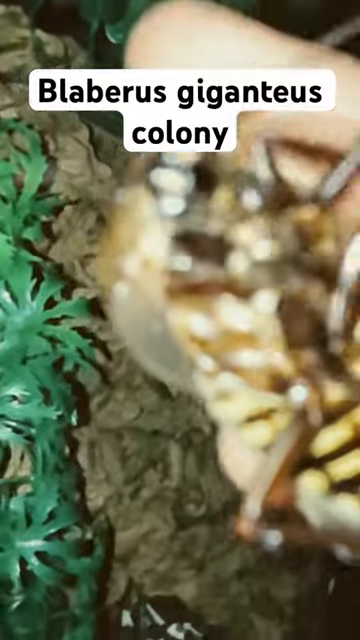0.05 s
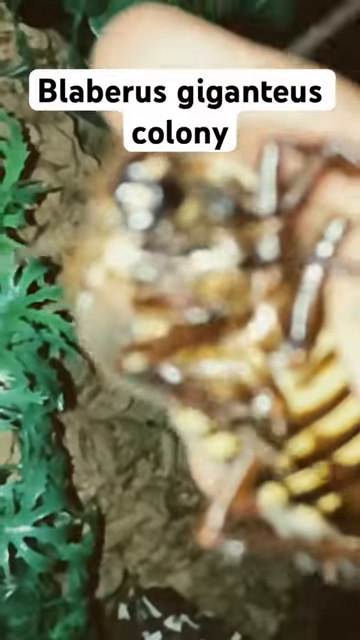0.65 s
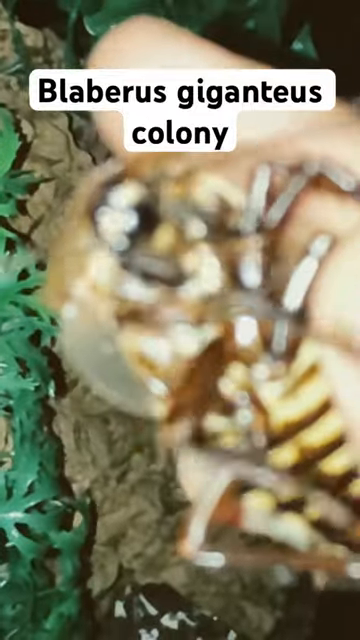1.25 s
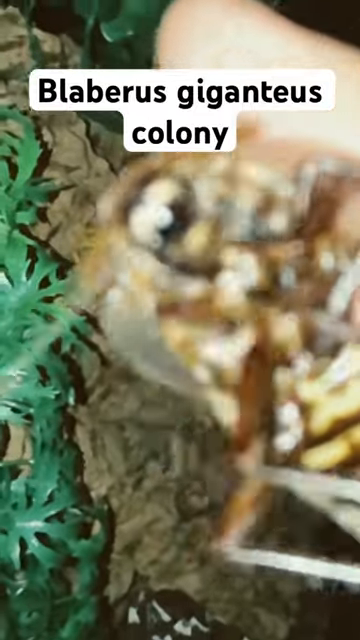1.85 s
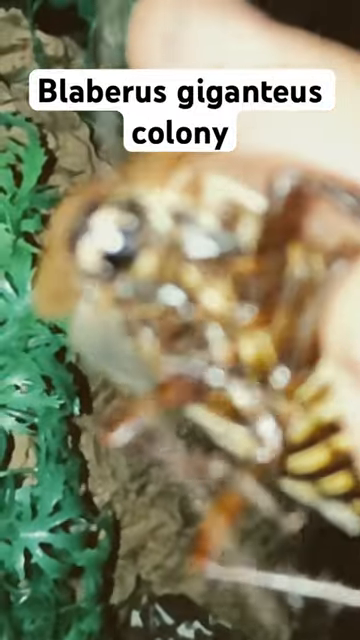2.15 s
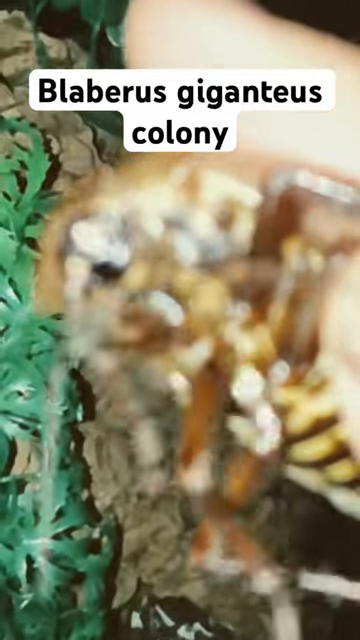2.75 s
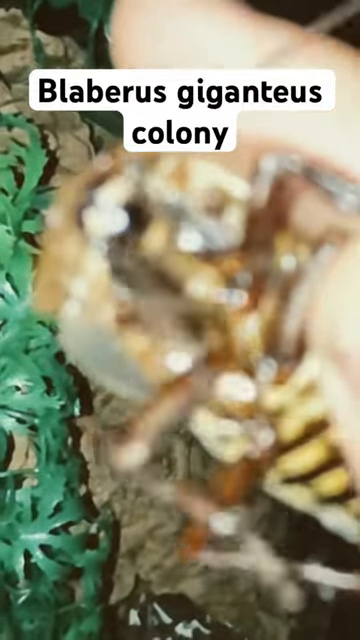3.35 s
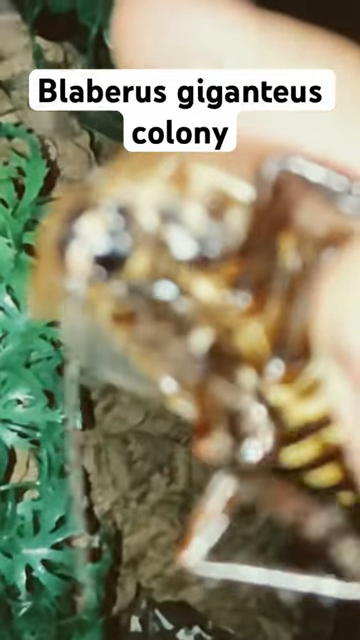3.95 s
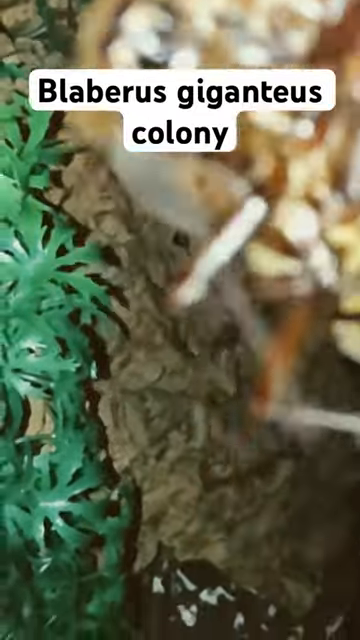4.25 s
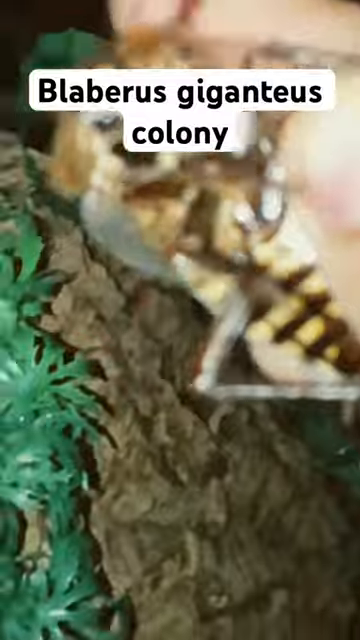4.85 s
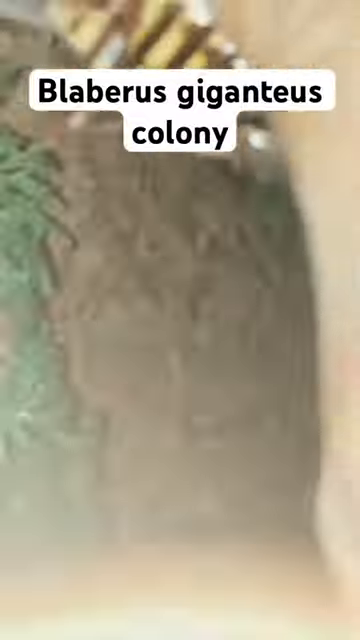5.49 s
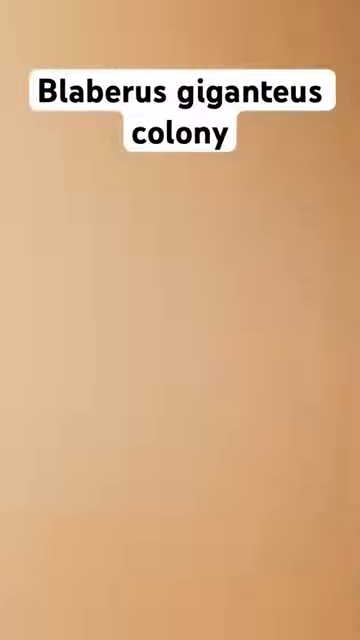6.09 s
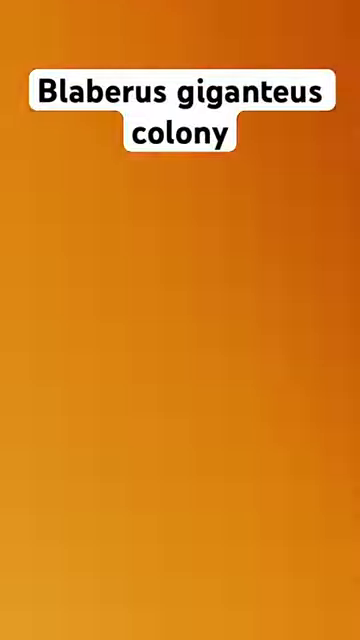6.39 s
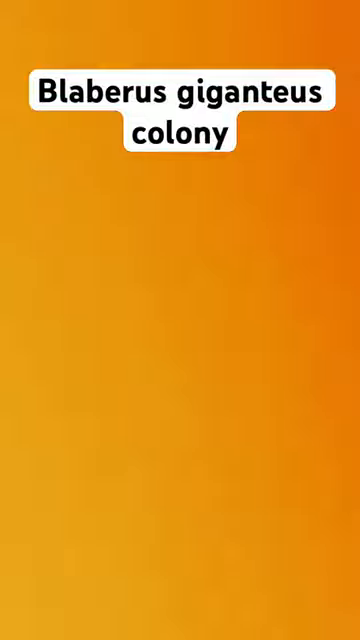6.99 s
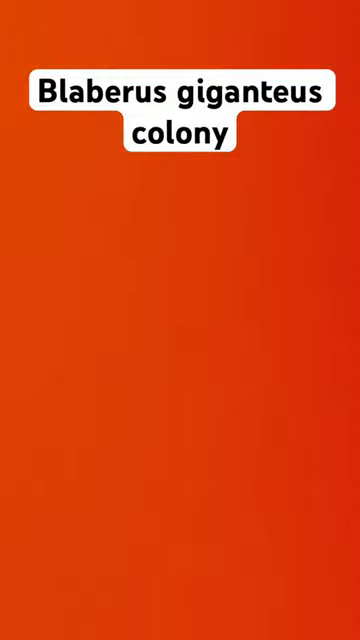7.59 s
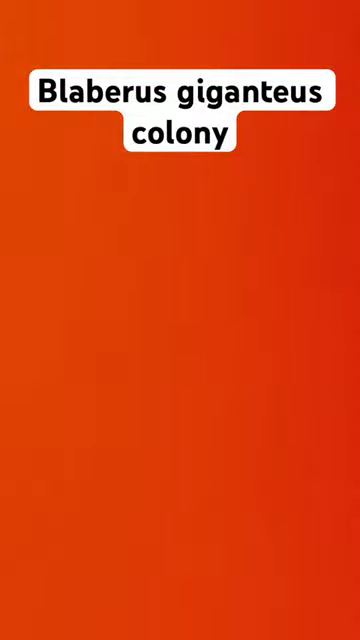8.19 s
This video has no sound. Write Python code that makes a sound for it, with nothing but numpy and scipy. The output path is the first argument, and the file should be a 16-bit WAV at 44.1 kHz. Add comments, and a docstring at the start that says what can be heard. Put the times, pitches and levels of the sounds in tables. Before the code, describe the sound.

A big cockroach's legs faintly scratch and tick against fingers, then a hand rubs over the phone and knocks loudly on the microphone.

```python
"""Scratching and ticking come first: the spiny legs of a big cockroach drag and catch on the fingers
that hold it over its enclosure, close to a phone. Then the hand shifts on the phone: skin hisses as it
slides over the case, judders over the microphone opening and knocks loudly. Each knock arrives treble
first and bass last, as a short falling thump. A quiet room hums behind."""
import sys
import numpy as np
from scipy import signal
from scipy.fft import rfft, irfft, next_fast_len
from scipy.io import wavfile
from scipy.ndimage import uniform_filter1d, minimum_filter1d, map_coordinates

SR = 44100
rng = np.random.default_rng(int(sys.argv[2]) if len(sys.argv) > 2 else 0)


def bounce(signal):
    """Save signal as a 16-bit WAV file at the path given by the first command-line argument."""
    frames = np.transpose(np.atleast_2d(signal))
    limited = np.clip(frames, -1, 1)
    pcm = np.round(limited * 32767).astype(np.int16)
    wavfile.write(sys.argv[1], SR, pcm)


N = 362930


def amp(db):
    """Turn decibels into a gain."""
    return 10 ** (np.asarray(db) / 20)


def unit(x):
    """Scale a sound to an average (rms) level of 1."""
    return x / np.sqrt(np.mean(x ** 2) + 1e-20)


def level(points):
    """Join (seconds, dB) points into a gain for every sample."""
    return amp(np.interp(np.arange(N) / SR, *np.transpose(points)))


def colour(points):
    """Join (Hz, dB) points into a tone curve: a gain for every frequency."""
    f, db = np.transpose(points)
    return lambda hz: amp(np.interp(np.log(hz + 1), np.log(f), db))


def ringing(hz, pitch_hz, ring_db, share):
    """A flat tone curve with one bump, whose half width is a share of its pitch."""
    return 1 + amp(ring_db) / (1 + 1j * (hz / pitch_hz - 1) / share)


def filtered(x, response):
    """Pass a sound through a tone curve."""
    size = next_fast_len(len(x) + SR // 4)
    return irfft(rfft(x, size) * response(np.fft.rfftfreq(size, 1 / SR)), size)[:len(x)]


def add(track, s, sound):
    """Mix a sound in at s seconds."""
    start = max(round(s * SR), 0)
    track[start:start + len(sound)] += sound[:N - start]


def wobble(rate):
    """A smooth curve through `rate` random values a second."""
    return map_coordinates(rng.standard_normal(int(N * rate / SR) + 4), [np.arange(N) * rate / SR])


def swell(t, length, shape=2.6):
    """A movement grows and fades around t = 0. Shape 2 is a bell; more gives a flatter top."""
    return np.exp(-np.abs(2 * t / length) ** shape)


def grains(rate, spread_db, life_s):
    """Tiny noise bursts of uneven size at random moments, about `rate` a second."""
    sizes = (rng.random(N) < rate / SR) * amp(spread_db * np.minimum(rng.standard_normal(N), 1))
    power = signal.lfilter([1], [1, -np.exp(-2 / (life_s * SR))], sizes ** 2)
    return unit(np.sqrt(power) * rng.standard_normal(N))


def air_pocket(x, depth_db, size=(9, 36)):
    """Resonances come and go as the pocket of air under a finger changes shape."""
    spectrum = signal.stft(x, nperseg=256)[2]
    drift = rng.standard_normal(spectrum.shape)
    for axis in (0, 1, 0, 1):  # smooth over frequency and time, twice
        drift = uniform_filter1d(drift, size[axis], axis)
    return signal.istft(spectrum * amp(depth_db * unit(drift)), nperseg=256)[1][:len(x)]


# The tone of the room's noise. Each row: frequency in Hz, gain in dB.
ROOM_TONE = [(15, -40.5), (25, -15.5), (53, 2), (87, -8), (363, -8), (591, -14.5), (714, -13), (936, -17.5),
             (1330, -19), (1560, -23), (2910, -23), (5280, -29), (6920, -26), (16000, -36.5)]
# The hum sinks away. Each row: time in seconds, level in dB.
HUM_LEVELS = [(0.0, -59.5), (0.5, -63), (1.3, -66.5), (1.9, -71), (2.9, -71), (3.4, -90), (4.2, -74.5),
              (8.23, -77.5)]

def room(air_db=-66.5, hum_hz=125, width_hz=16, cut_hz=40):
    """Steady room noise and a fuzzy low hum."""
    air_tone = lambda hz: colour(ROOM_TONE)(hz) * hz ** 3 / np.hypot(hz ** 3, cut_hz ** 3)
    hum_tone = lambda hz: 1 / (1 + ((hz - hum_hz) / width_hz) ** 2)
    air = unit(filtered(rng.standard_normal(N), air_tone))
    hum = unit(filtered(rng.standard_normal(N), hum_tone))
    return amp(air_db) * air + level(HUM_LEVELS) * hum


# How long the enclosure rings. Each row: frequency in Hz, seconds to fade by 60 dB.
RING_TIMES = [(300, 0.097), (3000, 0.19), (14000, 0.026)]

def enclosure(x, echo_db, delay_s=0.002):
    """The walls add a short, dense echo whose highest treble dies first."""
    hz, t, noise = signal.stft(rng.standard_normal(SR // 8), SR, nperseg=128)
    ring_s = np.interp(hz, *np.transpose(RING_TIMES))
    tail = signal.istft(noise * amp(-60 * t / ring_s[:, None]), SR, nperseg=128)[1]
    tail = np.pad(tail, (round(delay_s * SR), 0))
    return x + amp(echo_db) * signal.fftconvolve(x, tail / np.linalg.norm(tail))[:N]


# The tone of the hollow of the hand. Each row: frequency in Hz, gain in dB.
HOLLOW_TONE = [(120, -17), (200, -9.5), (237, -4.5), (453, 0.5), (629, -14.5), (1010, -12), (1190, -14),
               (1290, -9.5), (1500, -28), (1950, -25), (3300, -120)]
# The fingers adjust their hold. Each row: middle in seconds, length in seconds, level in dB, pitch in Hz.
GRIP_SHIFTS = [(0.186, 0.35, -54.5, 466), (0.33, 0.016, -48, 520), (0.544, 0.13, -61, 990),
               (1.1, 2.2, -71, 403), (2.435, 0.47, -64.5, 457), (2.739, 0.039, -59, 594),
               (4.142, 0.046, -60, 520), (7.25, 0.23, -58.5, 650), (8.099, 0.71, -64, 618)]

def grip(tone_peak_hz=450):
    """The fingers shift with a dull rustle; a smaller hollow in the hand sounds higher."""
    out, t = np.zeros(N), np.arange(N) / SR
    rustle = grains(rate=360, spread_db=11.5, life_s=0.0065)
    for s, length, db, pitch_hz in GRIP_SHIFTS:
        hollow = lambda hz: colour(HOLLOW_TONE)(hz * tone_peak_hz / pitch_hz)
        out += amp(db) * swell(t - s, length) * unit(filtered(rustle, hollow))
    return out


# The hiss of the legs, and the high fizz of anything gripping. Each row: frequency in Hz, gain in dB.
LEG_TONE = [(410, -6), (700, -3.5), (839, -7), (1050, 0.5), (1190, -9.5), (1330, -0.5), (1510, -7),
            (2900, -4.5), (3710, -5), (5510, -3), (8090, -10), (9000, -15), (11700, -22.5), (19800, -120)]
FIZZ_TONE = [(5000, -41), (7500, -4.5), (9500, -1.5), (12000, -1.5), (14500, -0.5), (16000, -2.5)]
# The insect struggles, tires and then stirs only faintly. Each row: time in seconds, level in dB.
LEG_EFFORT = [(0, -54.5), (.6, -57), (.95, -58), (1.25, -60), (1.7, -61.5), (1.88, -70), (2.25, -62),
              (2.4, -67), (2.55, -65), (2.8, -69.5), (3.35, -73.5), (3.6, -70), (4.0, -72), (7.6, -79.5),
              (8.1, -71.5)]

def scrabble(kicks_per_s=16, kick_db=1.6, slip_db=-5.5, fizz_db=-7.5, catch_db=-13):
    """Spiny legs drag over skin in uneven kicks: a grainy hiss with slips, fizz and tiny catches."""
    effort = level(LEG_EFFORT) * amp(kick_db * wobble(kicks_per_s))
    scratch = rng.standard_normal(N) + amp(-1) * grains(rate=170, spread_db=12, life_s=0.0011)
    slips = grains(rate=30, spread_db=-1.5, life_s=0.0045)
    scratch = air_pocket(scratch + amp(slip_db) * slips, depth_db=0.66)
    hiss = unit(filtered(scratch, colour(LEG_TONE)))
    fizz = unit(filtered(scratch, colour(FIZZ_TONE)))
    catches = unit(filtered(grains(rate=37, spread_db=9, life_s=0.0012), colour(FIZZ_TONE)))
    return effort * (hiss + amp(fizz_db) * fizz + amp(catch_db) * catches)


# The tone of a dry snap. Each row: frequency in Hz, gain in dB.
SNAP_TONE = [(350, -40), (600, -8.5), (1750, -9), (4840, -3.5), (6120, -4), (6730, 0.5), (7940, -5.5),
             (8740, 1.5), (12200, -7), (14500, -3.5), (16000, -15.5)]
# Small dry ticks of leg spines and skin. Each row: start in seconds, peak level in dB, pitch in Hz,
# treble in dB (-7.5 leaves the tone as it is), second catch in dB compared with the first.
DRY_TICKS = [(0.169, -37, 3260, -35, -9), (0.217, -27, 9700, -19, -21), (0.237, -38, 5170, -16, -26),
             (0.38, -37.5, 5100, -11, -6), (0.4615, -37, 2810, -27, -26), (0.628, -40, 5610, -16.5, -27),
             (0.738, -37, 5900, -18, -5), (0.7756, -34.5, 2780, -30, -22), (0.9008, -36.5, 2680, -17, -9),
             (1.048, -37.5, 4400, -7, -23), (1.129, -41.5, 4900, -1, -13), (1.1535, -37.5, 5320, -22, -12),
             (1.301, -36.5, 6230, -19, -5), (1.478, -26.5, 6700, -15, -3), (1.73, -34.5, 9600, -17.5, -2.5),
             (1.9745, -43, 4260, -19, -4), (2.173, -41, 4600, -10, -9), (2.3042, -32, 3230, -9, -7.5),
             (2.41, -46, 1800, -28, -15), (2.478, -44, 4020, -16, -4), (2.543, -38, 7300, -23, -14),
             (2.5648, -37.5, 9900, -10, -20), (2.6517, -29, 5130, -11, -15),
             (2.8846, -43.5, 6200, -28, -14), (3.212, -51.5, 4930, -22, -9), (3.986, -46, 9100, -13, -20),
             (4.2428, -44.5, 2830, -29, -18), (4.492, -40.5, 7300, -4, 3), (4.5301, -32, 2870, -18.5, -26),
             (6.423, -45, 3870, -13, -16), (6.4563, -42.5, 2480, -19, -20), (6.473, -44, 6090, -13, -20),
             (6.6135, -32, 6660, 2, 1), (6.6294, -31.5, 6360, -5, -18), (7.2555, -39, 2230, -13, -20),
             (7.9754, -41, 1930, -24, -25), (8.0534, -38, 4000, -38, -31), (8.1344, -43.5, 4480, -23, -9),
             (8.1753, -48.5, 4550, -24, -15.5)]

def ticks(attack_s=0.0012, life_s=0.0021, second_catch_s=0.006, ragged_db=5.0):
    """Leg spines, and skin on the phone case, catch and snap free, then catch again a moment later."""
    out, t = np.zeros(N), np.arange(-SR // 100, SR // 30) / SR
    catch = lambda age: np.exp(-np.abs(age - attack_s) / np.where(age < attack_s, attack_s, life_s))
    for s, db, pitch_hz, treble_db, second_db in DRY_TICKS:
        ragged = amp(ragged_db * unit(uniform_filter1d(rng.standard_normal(len(t)), size=24)))
        envelope = catch(t) + amp(second_db) * catch(t - second_catch_s)
        tilt = colour([(4000, 0.002), (10000, treble_db + 7.5)])
        tone = lambda hz: colour(SNAP_TONE)(hz) * tilt(hz) * ringing(hz, pitch_hz, 4.5, share=0.11)
        snap = filtered(rng.standard_normal(len(t)) * ragged * envelope, tone)
        add(out, s + t[0], amp(db) * snap / np.abs(snap).max())
    return out


# The hiss of sliding skin, and the low body of the case. Each row: frequency in Hz, gain in dB.
SKIN_TONE = [(700, -21.5), (1000, -8.5), (1400, -6), (1800, -1), (2300, -0.5), (3000, -1.5), (4200, -1),
             (6000, -2.5), (8000, -9), (11000, -26.5), (16000, -26)]
BODY_TONE = [(50, -17), (110, 0.5), (200, 0), (300, 0.5), (440, -2), (620, -4), (800, -6.5), (1100, -10),
             (1600, -15.5), (2600, -37.5)]
# Skin strokes the case. Each row: middle in seconds, length in seconds, hiss level in dB,
# fizz and body in dB compared with the hiss, pitch of the hiss in Hz.
SKIN_STROKES = [(4.04, 0.21, -63.5, -11, 5, 7500.0), (4.222, 0.21, -66.5, -3, -3.0, 6400.0),
                (4.439, 0.12, -61, -5, -6, 2640), (4.52, 0.06, -63.5, -2, 3.5, 7500.0),
                (4.655, 0.24, -60.5, -10, -2, 3170), (4.776, 0.095, -56.5, -7, -6.5, 3520),
                (4.884, 0.072, -52.5, -3, -4.0, 5550), (5.008, 0.103, -60.0, -6, 1.5, 4060),
                (5.133, 0.073, -63, -6.0, 6.5, 7500.0), (5.34, 0.14, -59.0, -4.5, -3.5, 2800),
                (5.42, 0.038, -61, 2, 6, 3140), (5.519, 0.16, -56, -3.5, -4, 6600),
                (5.633, 0.089, -54.0, -8.5, -6.0, 2740), (5.73, 0.041, -54, -6.5, 6, 4300),
                (5.835, 0.16, -52.5, -9.5, -1.5, 5560), (6.034, 0.21, -59, -10, 1, 1700.0),
                (6.08, 0.018, -53, -2.5, -0.5, 4600.0), (6.216, 0.09, -56.5, -12.0, 8.5, 1700.0),
                (6.339, 0.026, -61.5, -1, 6, 3100.0), (6.359, 0.14, -62, -9, -0.5, 1680),
                (6.507, 0.1, -66.5, -11.5, 13, 1700.0), (6.596, 0.021, -52.5, -14.5, 5, 1700.0),
                (6.686, 0.16, -48, -11, 2, 2100.0), (6.897, 0.048, -46, -25, 5.5, 2500.0),
                (6.96, 0.052, -46.0, -11, -0.5, 2780), (7.007, 0.096, -60.5, -12, 2.0, 1720),
                (7.089, 0.056, -65, -5.5, 8.5, 1710), (7.18, 0.076, -51.5, -10.5, -0.5, 2000.0),
                (7.316, 0.08, -48.0, -3, -11.5, 1700.0), (7.405, 0.077, -53, -7, -29, 7500.0),
                (7.476, 0.17, -56.5, -6.0, -4.5, 7500.0), (7.728, 0.22, -71, -6.0, -17, 1700.0),
                (7.864, 0.13, -65, -31, -2, 1720)]

def rubs():
    """Sliding skin hisses, while small uneven slips sound the body of the case."""
    out, t = np.zeros(N), np.arange(-SR // 4, SR // 4) / SR
    slide = rng.standard_normal(N) + amp(-5) * grains(rate=310, spread_db=13.5, life_s=0.0011)
    slide = air_pocket(slide, depth_db=0.3)
    fizz = unit(filtered(slide, colour(FIZZ_TONE)))
    body = unit(filtered(grains(rate=820, spread_db=-1.5, life_s=0.0081), colour(BODY_TONE)))
    for s, length, db, fizz_db, body_db, pitch_hz in SKIN_STROKES:
        span = np.arange(len(t)) + round((s + t[0]) * SR)
        tone = lambda hz: colour(SKIN_TONE)(hz) * ringing(hz, pitch_hz, ring_db=-3.5, share=0.18)
        hiss = unit(filtered(slide[span], tone))
        rub = hiss + amp(fizz_db) * fizz[span] + amp(body_db) * body[span]
        add(out, s + t[0], amp(db) * swell(t, length) * rub)
    return out


# The resonances of the phone case. Each row: frequency in Hz, gain in dB.
CASE_TONE = [(60, 5.5), (130, 5.5), (200, 3), (290, 1), (450, 2.5), (620, 3.5), (780, 1.5), (1100, -2.5),
             (1700, -2.5), (2400, -1.5), (3300, -2.5), (5000, 0)]

def contact(low_hz, high_hz, lag_cycles=1.65, rest_hz=25, steep=1.32):
    """A touch on the phone, heard through its microphone, arrives treble first and bass last."""
    def response(hz):
        bass_hump = (hz / low_hz) ** 2 / np.sqrt(1 + (hz / low_hz) ** 6)
        treble_loss = np.hypot(1, hz / high_hz) ** steep
        lag = np.exp(-2j * np.pi * lag_cycles * np.log(np.hypot(hz, rest_hz)))
        return bass_hump / treble_loss * colour(CASE_TONE)(hz) * lag
    return response


# The hiss at the microphone opening. Each row: frequency in Hz, gain in dB.
OPENING_TONE = [(1500, -27), (3000, -11.5), (4200, 0), (8000, -2), (10300, -0.5), (12500, -4.5),
                (15500, 1.5)]
# Skin scuffs the opening. Each row: loudest moment in seconds, level in dB, rise and fall in seconds,
# low and high edge in Hz, hiss in dB compared with the judder.
SKIN_SCUFFS = [(0.515, -53.5, 0.0072, 0.026, 1010, 1800, 0), (5.73, -55, 0.012, 0.017, 318, 1000, -2),
               (5.865, -47.5, 0.0079, 0.03, 600, 1600, -4), (6.089, -49, 0.011, 0.028, 273, 800, -13),
               (6.191, -29.5, 0.0053, 0.013, 450, 1500, -6), (6.203, -23, 0.0077, 0.0056, 650, 800, -2.5),
               (6.357, -42.5, 0.005, 0.03, 390, 1300, -17), (6.597, -32.5, 0.011, 0.0089, 447, 1500, -21),
               (6.723, -30, 0.034, 0.0082, 900, 7020, -8), (6.730, -8, 0.0045, .014, 475, 2600, -26),
               (6.755, -8.5, 0.015, 0.028, 151.8, 1100, -44),
               (6.842, -14.5, 0.0072, 0.0013, 378, 1100, -37.5),
               (6.864, -38.5, .002, 0.0083, 1510, 9000, 8), (6.892, -37, 0.01, 0.01, 2120, 5000, -14)]

def scuffs(shape=1.35):
    """Pressed skin judders over the microphone opening, swelling until it lets go."""
    out, t = np.zeros(N), np.arange(-SR // 4, SR // 4) / SR
    for s, db, rise, fall, low_hz, high_hz, hiss_db in SKIN_SCUFFS:
        envelope = np.exp(-(np.abs(t) / np.where(t < 0, rise, fall)) ** shape)
        judder = unit(filtered(envelope * rng.standard_normal(len(t)), contact(low_hz, high_hz)))
        hiss = unit(filtered(envelope * rng.standard_normal(len(t)), colour(OPENING_TONE)))
        gain = amp(db) * np.sqrt(np.mean(envelope ** 2))
        add(out, s + t[0], gain * (judder + amp(hiss_db) * hiss))
    return out


def thump(low_hz, high_hz, crunch_db=-20, crunch_s=0.0017):
    """One push with a little crunch, heard through the phone's microphone as a falling thump."""
    t = np.arange(SR // 6) / SR
    burst = rng.standard_normal(len(t)) * np.exp(-t / crunch_s)
    crunch = filtered(burst, lambda hz: hz / np.hypot(hz, 900))
    push = filtered((t == 0) + amp(crunch_db) * crunch, contact(low_hz, high_hz))
    return push / np.abs(push).max()


# Knocks on the case; heavy ones reach lower, hard ones higher. Each row: start in seconds, level in dB,
# low and high edge in Hz, fade time of the chatter in seconds, crack in dB compared with the knock.
CASE_KNOCKS = [(4.398, -46.5, 280, 1200, 0.0046, -12), (4.524, -45.5, 200, 1200, .006, -20),
               (4.639, -46, 250, 900, 0.0049, -21), (4.828, -49.5, 216, 700, .004, -20),
               (5.519, -47.5, 90, 800, 0.0031, 4), (5.84, -29, 72, 2500, 0.0027, 0.5),
               (6.205, -23, 120, 1000, 0.0023, -22), (6.3417, -39, 178, 2500, 0.0038, 2.5),
               (6.4, -39.5, 114, 900, 0.0037, -13), (6.4754, -38.5, 290, 1200, 0.012, -20),
               (6.603, -19.5, 288, 1206, 0.0024, -5), (6.729, -1, 255.3, 1300, 0.025, -6),
               (6.741, -4.5, 110, 500, .004, -24), (6.7648, -3.5, 75, 353, 0.0031, -29),
               (6.7843, -18, 130, 650, 0.0044, -8), (6.797, -23, 197, 1000, .003, -8.5),
               (6.823, -17, 200, 1205, .008, -15.5), (6.833, -8.5, 168.3, 500, .003, -23),
               (6.841, -5.5, 187, 900, 0.0028, -15.5), (6.8509, -5, 140, 800, .002, -18.5),
               (6.853, -2, 110, 6030, .002, -5.5), (6.858, -2, 51.8, 110, 0.0046, -34),
               (6.8627, -7.5, 202.3, 1300, .002, -21), (7.079, -47, 190, 800, .004, -25),
               (7.248, -43.5, 80, 500, .004, -24), (7.273, -26, 70.6, 2500, .003, 1),
               (7.299, -36, 250, 5000, .002, 0.5), (7.427, -44.5, 302, 900, 0.0033, -12),
               (7.440, -42.5, 59.5, 500, 0.002, -20), (7.587, -51.5, 300, 1200, .004, -3)]

def knocks(contacts=8, gap_s=0.009, gap_scatter=0.22, soften_s=0.024, crack_s=0.0015):
    """A knock cracks, thumps and chatters on in ever weaker, lower contacts."""
    out, t = np.zeros(N), np.arange(SR // 50) / SR
    for s, db, low_hz, high_hz, chatter_s, crack_db in CASE_KNOCKS:
        burst = rng.standard_normal(len(t)) * np.exp(-t / crack_s)
        crack = filtered(burst, contact(low_hz=900, high_hz=7500, lag_cycles=0.781))
        add(out, s, amp(db + crack_db) * crack / np.abs(crack).max())
        gaps = gap_s * np.exp(gap_scatter * rng.standard_normal(contacts))
        for age in np.cumsum(gaps) - gaps[0]:
            lower = 1 / (1 + age / soften_s)
            add(out, s + age, amp(db) * np.exp(-age / chatter_s) * thump(low_hz * lower, high_hz * lower))
    return out


def scene():
    """Scrabbling, grip and ticks echo in the enclosure; rubs, scuffs and knocks have no echo."""
    echoing = enclosure(scrabble() + grip() + ticks(), echo_db=-14)
    return (echoing + rubs() + scuffs() + knocks() + room())[None]


def record(dry, ceiling=0.9, top_hz=15950):
    """A fast limiter turns the loudest knocks down, and the very highest treble is cut off."""
    needed_gain = ceiling / np.maximum(np.abs(dry[0]), ceiling)
    gain = uniform_filter1d(minimum_filter1d(needed_gain, size=60), size=60)
    treble_cut = lambda hz: 1 / (1 + (hz / top_hz) ** 200)
    return filtered(dry[0] * gain, treble_cut)[None]


dry = scene()
out = record(dry)
bounce(out)
```